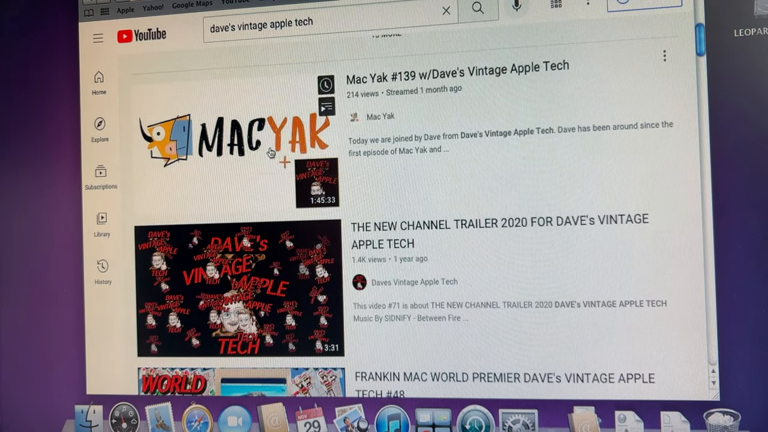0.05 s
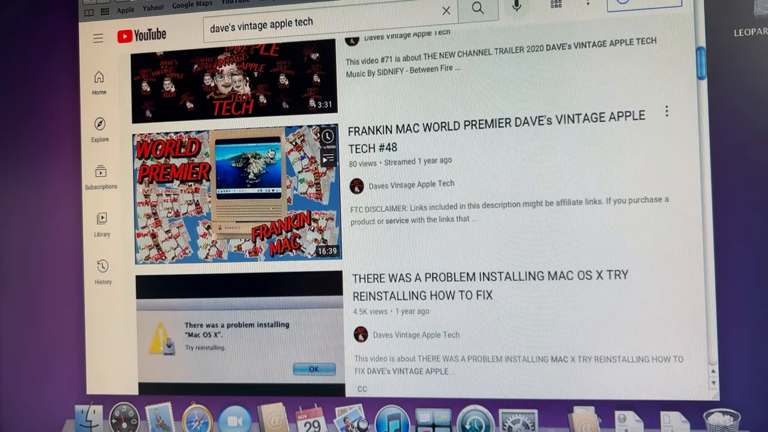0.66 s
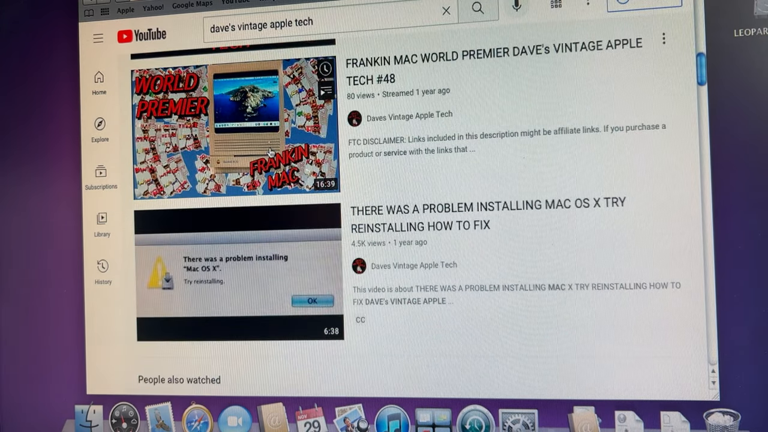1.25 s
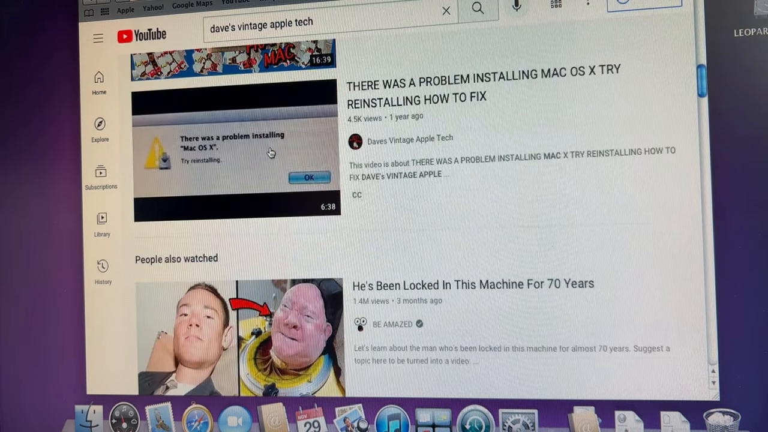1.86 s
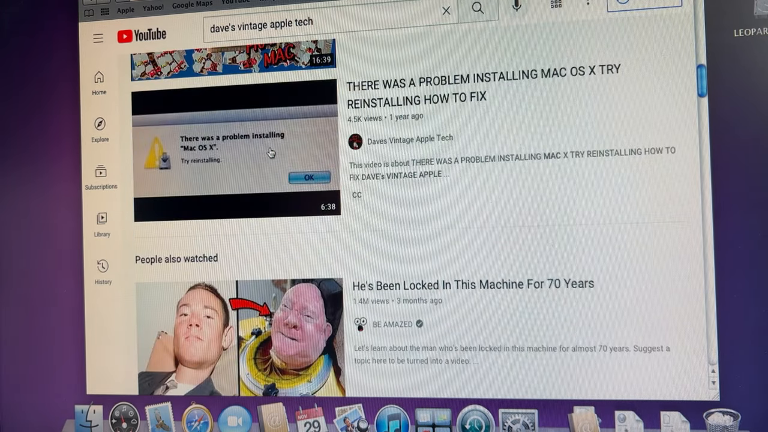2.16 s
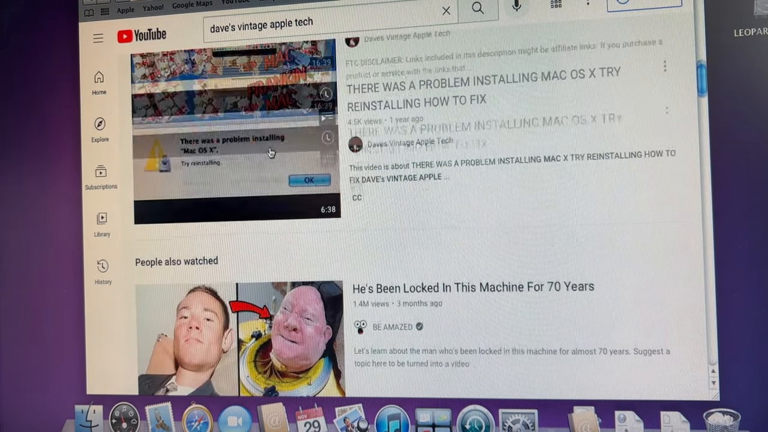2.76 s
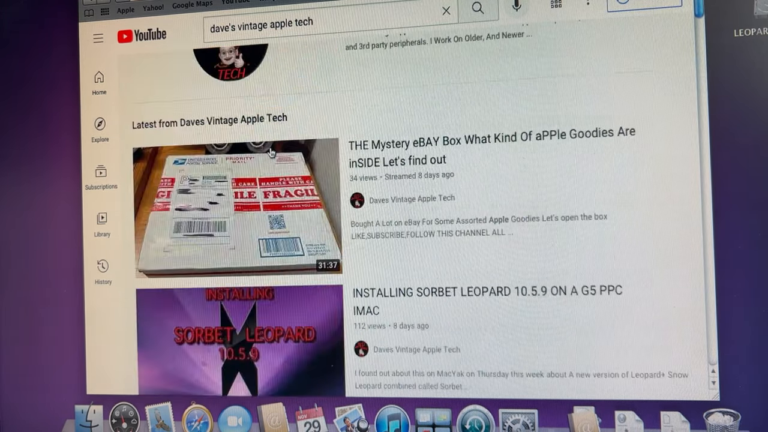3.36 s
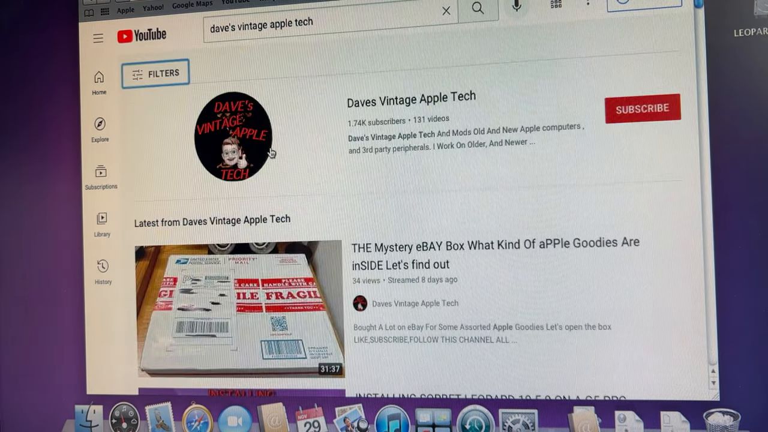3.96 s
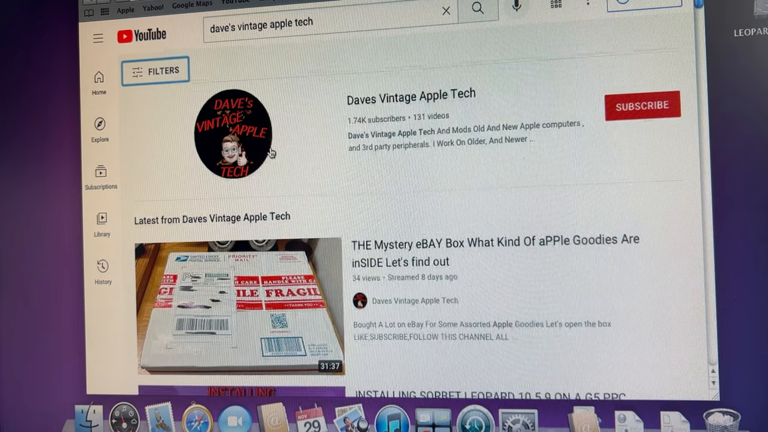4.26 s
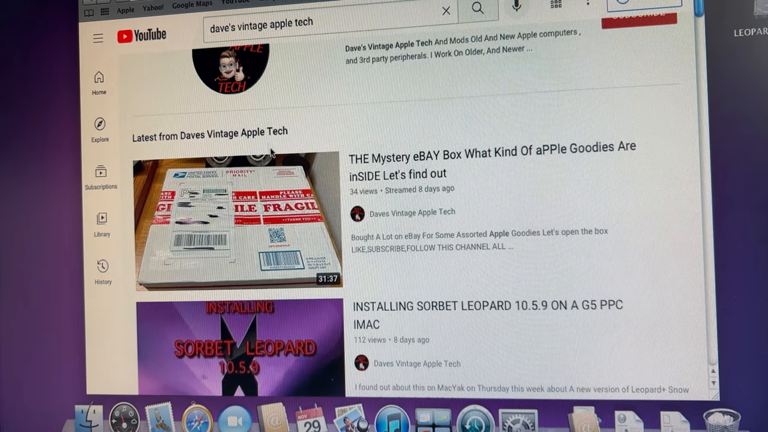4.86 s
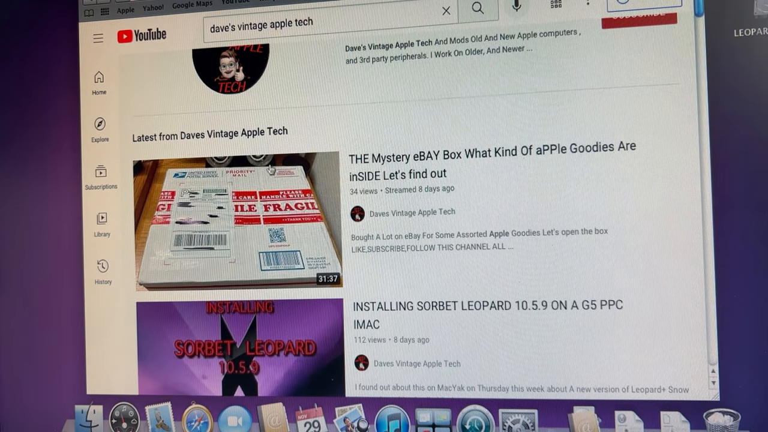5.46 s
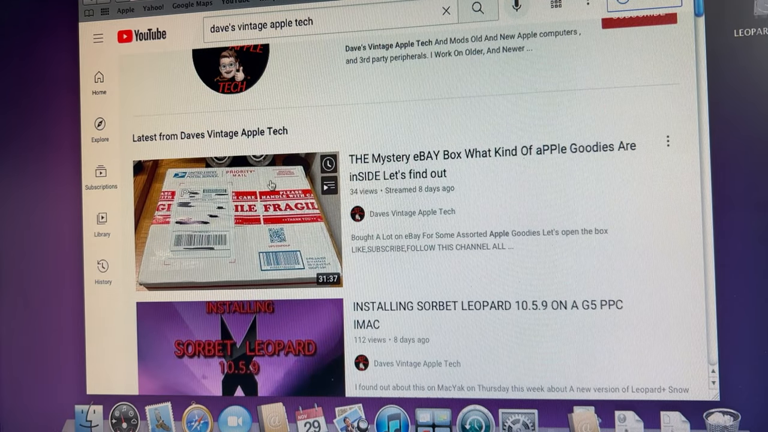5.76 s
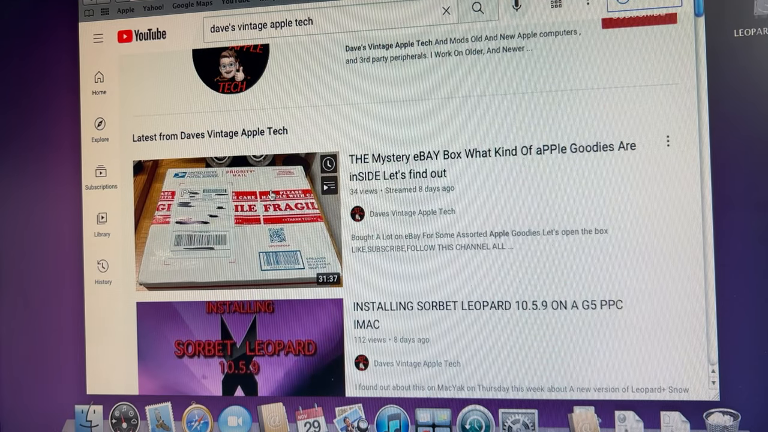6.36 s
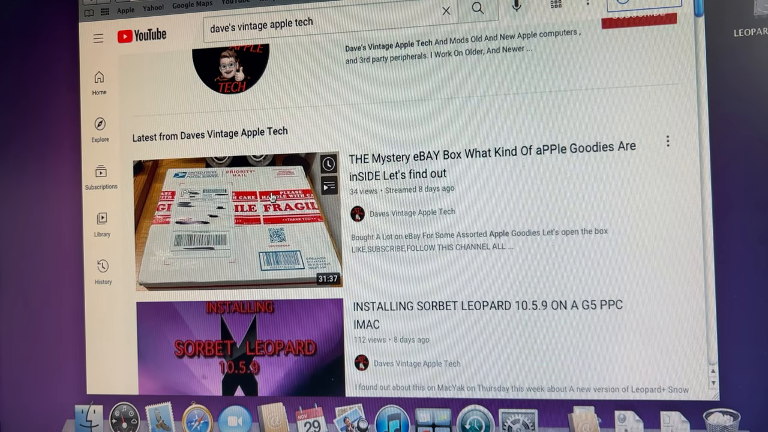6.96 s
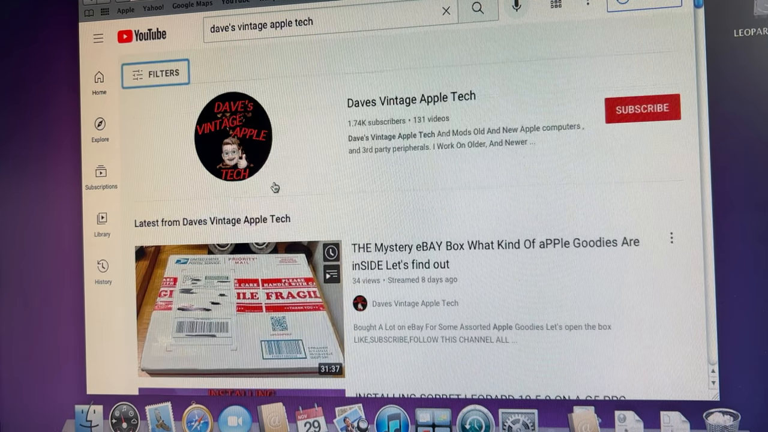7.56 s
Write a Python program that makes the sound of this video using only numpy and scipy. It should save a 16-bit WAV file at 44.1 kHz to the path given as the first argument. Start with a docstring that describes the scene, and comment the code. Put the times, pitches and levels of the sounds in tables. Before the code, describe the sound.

A desktop computer's even fan hum runs under light mouse clicks, short scroll wheel flicks and soft bumps on the microphone.

```python
"""Two cooling fans hum in a desktop computer close by: their slightly unbalanced shafts and
passing blades make steady tones. Behind them, swirling air rushes and makes the case and desk ring.
Someone scrolls and clicks a mouse, ringing its shell and the desk, with bright snaps and short scuffs.
A few soft bumps on the hand-held stereo microphone come through as low thumps."""
import sys
import numpy as np
from scipy import signal
from scipy.fft import rfft, irfft
from scipy.io import wavfile

SR = 44100
rng = np.random.default_rng(int(sys.argv[2]) if len(sys.argv) > 2 else 0)


def unload_audio(sound):
    """Save the sound as a 16-bit wav file, at the path given as the first command line argument."""
    columns = np.transpose(np.atleast_2d(sound))
    # keep every value between -1 and 1, then stretch to whole-number steps
    steps = np.round(np.clip(columns, -1, 1) * 32767)
    wavfile.write(sys.argv[1], SR, steps.astype(np.int16))


N = 340452
T, HZ = np.arange(N) / SR, np.fft.rfftfreq(N, 1 / SR)

# the rush of air: f/Hz, level/dB per Hz
AIR_SPECTRUM = [(20, -89), (35, -77), (70, -71), (130, -71), (220, -72.5), (420, -75.5), (730, -68.3),
                (1050, -71.5), (1750, -77), (3000, -79.5), (4500, -83.5), (6500, -90), (7200, -92),
                (9400, -100.3), (10300, -108), (12500, -108), (14000, -125)]
# how alike the air sounds left and right: f/Hz, likeness (1 the same, -1 opposite)
AIR_LIKENESS = [(110, 0.72), (170, 0.29), (260, -0.47), (450, -1), (750, -0.92), (1500, -0.034),
                (2500, -0.26), (8500, 0.36)]
# pitches at which case and desk ring: f/Hz, width/Hz, left level/dB, right level/dB, left lead/rad
CASE_RESONANCES = [(282, 30, -63.0, -80.5, 3.1), (295, 16, -56.5, -59.0, 0.1), (314, 44, -60.5, -67.0, 0.9),
                   (385, 41, -58.5, -68.5, 0.3), (450, 55, -64.5, -64.5, 0.1), (499, 54, -68.5, -66.5, 0.7),
                   (541, 45, -73.0, -62.5, -2.9), (571, 26, -78.5, -58.5, -0.1),
                   (594, 19, -68.0, -56.5, -1.5), (640, 29, -61.0, -61.0, 3.1),
                   (683, 40, -68.0, -65.5, 1.1), (727, 45, -62.0, -63.0, 3.0),
                   (779, 47, -64.0, -65.5, -2.9), (804, 19, -62.0, -74.5, -1.8),
                   (848, 24, -57.0, -74.5, -1.1), (884, 17, -62.5, -68.5, 2.3),
                   (920, 24, -70.0, -69.0, 0.4), (1039, 72, -69.0, -72.0, 3.1),
                   (1269, 34, -67.5, -66.0, 1.3), (1345, 44, -61.5, -68.5, 2.1),
                   (1378, 35, -62.5, -65.5, 2.5), (1461, 90, -72.5, -72.5, 3.1),
                   (1565, 61, -71.5, -71.5, 3.1), (1889, 41, -68.0, -72.5, -2.6),
                   (2106, 88, -73.0, -75.0, 1.4), (2211, 48, -73.5, -77.0, 1.5),
                   (2374, 123, -79.5, -80.5, 2.1), (2689, 45, -73.0, -79.5, -2.0),
                   (2819, 125, -73.5, -73.5, -2.3), (2891, 135, -80.0, -76.0, 1.7),
                   (3162, 92, -75.5, -82.0, -1.6), (3261, 40, -76.5, -84.0, 0.0),
                   (3775, 48, -79.5, -75.5, -0.2), (3871, 68, -82.5, -76.5, -1.4),
                   (4060, 165, -87.0, -80.0, -1.4), (4838, 450, -93.0, -80.5, 2.6),
                   (5526, 450, -95.0, -82.5, -3.1), (6344, 501, -91.0, -84.0, -1.6),
                   (7987, 175, -93.0, -98.0, -1.1), (8753, 327, -101.5, -101.5, -0.1)]
# the machine's other hums: f/Hz, left level/dB, right level/dB, left lead/rad, flutter (0 to 1)
HUMS = [(40.4, -62, -64, 0, .2), (71.3, -54, -54, 0, .16), (148, -52, -57.5, -1.7, .22),
        (323, -48.5, -60, 0, .3), (816.9, -48.5, -59, -2.8, .25), (851, -49.5, -60, 1.2, .44)]
# soft bumps on the microphone: t/s, level/dB, f/Hz
BUMPS = [(1.364, -40, 66), (2.632, -35, 105), (2.683, -20, 86), (5.83, -40, 51)]
# swells of rumble from the hand holding it: t/s, level/dB, rise/s, time to fade by 60 dB/s
HANDLING = [(1.17, -39, .093, .83), (1.39, -35, .08, .4), (2.665, -29.5, .05, .7), (5.8, -38.5, .17, .6)]
# the tone colour of that rumble: f/Hz, relative level/dB
RUMBLE_SPECTRUM = [(20, -22), (40, -7), (70, 9.5), (115, 3), (160, -8.5), (240, -20), (1000, -80)]
# bright plastic snaps and short scuffs of the mouse:
# t/s, level/dB, rise/s, time to fade by 60 dB/s, resonance f/Hz, treble tilt/dB per octave
SNAPS_AND_SCUFFS = [(1.505, -35, .0007, .07, 5200, -15), (5.012, -28, .0008, .085, 5700, 0),
                    (5.026, -30, .0015, .17, 5200, 0), (7.273, -28.5, .0005, .06, 4000, -7)]
# the tone colour they share: f/Hz, relative level/dB
SNAP_SPECTRUM = [(150, 0), (350, 10), (750, 3), (1200, 3.5), (2100, 1), (2700, -1), (3400, 2), (4500, -7),
                 (5600, -2), (6500, -4.5), (7200, -9), (8500, -10.5), (9600, -11), (10600, -14),
                 (13000, -24), (15500, -25)]
# flicks of the scroll wheel: start t/s, end t/s, rubbing level/dB
WHEEL_FLICKS = [(.81, 1, -57), (1.408, 1.687, -49), (2.573, 2.743, -47), (3.017, 3.136, -43),
                (4.074, 4.246, -49.5), (7.24, 7.416, -45)]
# the tone colour of plastic rubbing in the wheel: f/Hz, relative level/dB
RUB_SPECTRUM = [(500, -20), (1500, -8), (2050, -1), (2220, 16), (2420, 0), (2900, -2), (3700, -8),
                (5200, -14), (8000, -11), (11000, -36), (15500, -44)]
# the wheel's notches ticking past: t/s, tick level/dB
WHEEL_NOTCHES = [(.834, -32.5), (.886, -32), (.953, -32), (1.435, -36.5), (1.482, -33.5), (1.531, -31),
                 (1.582, -30.5), (1.658, -33.5), (2.609, -37.5), (2.631, -37.5), (2.704, -35.5),
                 (3.052, -38.5), (3.064, -36), (3.086, -38), (4.125, -38.5), (4.142, -36.5), (4.164, -33),
                 (4.232, -35), (7.203, -32.5), (7.346, -28), (7.39, -34)]
# clicks and finger taps: t/s, shell tick level/dB, desk knock level/dB, favoured desk pitch f/Hz
CLICKS = [(.845, -48, -33.5, 760), (.852, -48, -30.5, 830), (3.888, -54, -34, 600),
          (4.862, -31, -25.5, 650), (5.027, -36, -29, 900), (5.049, -50, -27.5, 430),
          (5.631, -32, -23, 640)]
# the ringing notes (modes) of mouse shell and desk: f/Hz, relative level/dB, time to fade by 60 dB/s
SHELL_MODES = [(1340, -4, .04), (1940, -1, .04), (2120, 5, .05), (2215, 12.5, .06), (2430, 6, .045),
               (2540, 3, .045), (2820, -1, .04), (3200, -4, .035)]
DESK_MODES = [(430, -2, .1), (600, 0, .07), (665, 4, .1), (745, 2, .08), (830, 2, .06), (930, -1, .07)]
# tones of the small eleven-bladed fan and the main seven-bladed fan,
# listed by multiple of the shaft speed: left level/dB, right level/dB, left lead/rad
SMALL_FAN_TONES = {1: (-42.8, -42.8, 0), 22: (-52, -63, -2.7), 33: (-58, -70, 0)}
MAIN_FAN_TONES = {1: (-42.5, -44.5, .1), 4: (-68, -59, 3), 7: (-36.3, -41.5, 1.3), 8: (-47.5, -52, .3),
                  14: (-46, -46, 3.1), 16: (-45, -53, 1.8), 20: (-62, -60, 3), 21: (-52.5, -48, -2.3),
                  28: (-58.5, -57, 2.9), 32: (-66, -66, 1)}


def gain_of(db):
    """Turns decibels into a number to multiply a sound by."""
    return 10 ** (np.asarray(db) / 20)


def unit_level(x):
    """Scales a signal so that its average size (rms) is 1."""
    return x / np.sqrt(np.mean(x ** 2) + 1e-20)


def curve(points):
    """Joins a table's points into a value for every frequency, on a log frequency axis."""
    hz, value = np.transpose(points)
    return np.interp(np.log(HZ + 1), np.log(hz + 1), value)


def drift(rate_hz):
    """A random wobble of average size 1, with little in it faster than rate_hz."""
    return unit_level(irfft(rfft(rng.standard_normal(N)) / (1 + (HZ / rate_hz) ** 4), N))


def noise(db, likeness):
    """Stereo noise with a level in dB per Hz and a chosen likeness between left and right."""
    left, other = rfft(rng.standard_normal((2, N)))
    likeness = np.clip(likeness, -1, 1)
    right = likeness * left + np.sqrt(1 - likeness ** 2) * other
    return irfft(np.array([left, right]) * gain_of(db), N) * np.sqrt(SR / 2)


def swell(peak_s, rise_s, fade_s):
    """A loudness shape that grows until peak_s, then drops by 60 dB every fade_s."""
    return np.exp(np.minimum(T - peak_s, 0) / rise_s - np.log(1000) * np.maximum(T - peak_s, 0) / fade_s)


def tone(hz, left_db, right_db, lead, flutter):
    """One tone fluttering in the swirling air; its left wave runs ahead of the right by lead radians."""
    turns = np.cumsum(hz) / SR + rng.random()
    wave = np.exp(2j * np.pi * turns) * (1 + flutter * (drift(23) + 1j * drift(5.3)))
    left = gain_of(left_db) * wave
    right = gain_of(right_db) * wave * np.exp(-1j * lead)
    return np.sqrt(2) * np.array([left, right]).real


def air(unsteady_db=0.45):
    """Swirling air makes an even rush, its bass alike on both sides and its middle range opposite."""
    return noise(curve(AIR_SPECTRUM), curve(AIR_LIKENESS)) * gain_of(unsteady_db * drift(30))


def case(boost_db=0.17, unsteady_db=1.1):
    """Swirling air stirs each resonance of case and desk on its own, giving narrow bands of noise."""
    spectrum = np.zeros((2, len(HZ)), complex)
    for hz, width, left_db, right_db, lead in CASE_RESONANCES:
        near = abs(HZ - hz) < 5 * width
        peak = 1 / (1 + (np.sqrt(2) - 1) * (2 * (HZ[near] - hz) / width) ** 2)
        real, imaginary = rng.standard_normal((2, near.sum()))
        sides = np.array([[gain_of(left_db)], [gain_of(right_db) * np.exp(-1j * lead)]])
        spectrum[:, near] += sides * peak * (real + 1j * imaginary)
    return irfft(spectrum, N) * np.sqrt(N * SR) / 2 * gain_of(boost_db + unsteady_db * drift(19))


def hums(wander=0.00179):
    """The machine's weaker hums, each wavering in pitch on its own."""
    return sum(tone(hz * (1 + wander * drift(2.15)), *rest) for hz, *rest in HUMS)


def thumps(sway_db=-8):
    """Soft pushes on the microphone swing a low resonance, the same on both sides, amid some rumble."""
    booms = np.zeros(N)
    for s, db, hz in BUMPS:
        push = swell(s, rise_s=.017, fade_s=.11)
        sway = gain_of(sway_db) * swell(s, rise_s=.025, fade_s=.5)
        booms += gain_of(db) * (push + sway) * np.sin(2 * np.pi * hz * (T - s))
    grip = sum(gain_of(db) * swell(s, rise_s, fade_s) for s, db, rise_s, fade_s in HANDLING)
    rumble = unit_level(noise(curve(RUMBLE_SPECTRUM), likeness=0.93))
    return np.sqrt(2) * booms + grip * rumble


def snaps_and_scuffs(peak_db=4.5, peak_width_hz=1600, dull_from_hz=6000, grain_db=1.2, grain_hz=300):
    """Bright plastic snaps and short scuffs of the mouse, each with its own resonance."""
    sound = np.zeros((2, N))
    sides = gain_of([[-3.5], [2]])  # the mouse lies to the right
    octaves_up = np.log2(np.maximum(HZ / dull_from_hz, 1))  # the duller ones lose this treble
    for s, db, rise_s, fade_s, hz, tilt_db in SNAPS_AND_SCUFFS:
        resonance_db = peak_db * 2 ** -(2 * (HZ - hz) / peak_width_hz) ** 2
        colour_db = curve(SNAP_SPECTRUM) + resonance_db + tilt_db * octaves_up
        sound += gain_of(db) * swell(s, rise_s, fade_s) * unit_level(noise(colour_db, likeness=0.79))
    return sound * sides * gain_of(grain_db * drift(grain_hz))


def ring(modes, detune=0.01, side_turns=0.07, uneven_db=1.5, rise_s=.0012):
    """One tap sets fading notes ringing, a little different each time and on each side."""
    hz, db, fade_s = np.transpose(modes)[:, :, None]
    db = db + uneven_db * rng.standard_normal(hz.shape)
    t = T[:SR // 10]
    start_turns = rng.random(hz.shape) + side_turns * rng.standard_normal((2, len(modes), 1))
    turns = hz * (1 + detune * rng.standard_normal(hz.shape)) * t + start_turns
    waves = gain_of(db - 60 * t / fade_s) * np.sin(2 * np.pi * turns)
    build_up = 1 - np.exp(-t / rise_s)  # a fingertip is soft
    return waves.sum(1) * np.sqrt(2) / np.linalg.norm(gain_of(db)) * build_up


def desk_knock(spot_hz, boost_db=5, reach_octaves=.2):
    """A knock on the desk: the spot that is struck favours the notes near spot_hz."""
    return ring([(hz, db + boost_db * 2 ** -(np.log2(hz / spot_hz) / reach_octaves) ** 2, fade_s)
                 for hz, db, fade_s in DESK_MODES])


def mouse(grain_db=3.0, snap_db=-7.5, notch_knock_db=-6, notch_hz=830):
    """The wheel rubs loudest in mid-flick; each notch or click snaps and rings the shell and the desk."""
    rings, rolling = np.zeros((2, N)), np.zeros(N)
    sides = gain_of([[-1.5], [1.5]])  # the mouse lies to the right
    for start, end, db in WHEEL_FLICKS:
        progress = np.clip((T - start) / (end - start), 0, 1)
        rolling += gain_of(db) * np.sin(np.pi * progress)
    friction = rolling * gain_of(grain_db * drift(70))
    notches = [(s, db, db + notch_knock_db, notch_hz) for s, db in WHEEL_NOTCHES]
    for s, tick_db, knock_db, spot_hz in CLICKS + notches:
        tick = gain_of(tick_db) * sides * ring(SHELL_MODES)
        knock = gain_of(knock_db) * desk_knock(spot_hz)
        slot = rings[:, round(s * SR):][:, :tick.shape[1]]
        slot += (tick + knock)[:, :slot.shape[1]]
        friction += gain_of(tick_db + snap_db) * swell(s, rise_s=0.00023, fade_s=0.034)
    rub = unit_level(noise(curve(RUB_SPECTRUM), likeness=0.96))
    return rings + sides * friction * rub


def fan(tones, turns_per_s, wander, flutter):
    """A fan's imbalance hums at its slightly wandering shaft speed, its blades at whole multiples of it."""
    shaft_hz = turns_per_s * (1 + wander * drift(2.055))
    return sum(tone(multiple * shaft_hz, *sides, flutter) for multiple, sides in tones.items())


def scene():
    """The running computer and the hand at work in front of it."""
    main_fan = fan(MAIN_FAN_TONES, turns_per_s=53.09, wander=0.00041, flutter=0.122)
    small_fan = fan(SMALL_FAN_TONES, turns_per_s=85.87, wander=0.002, flutter=0.39)
    return main_fan + small_fan + hums() + air() + case() + mouse() + snaps_and_scuffs() + thumps()


def record(dry):
    """Cuts away the very highest treble."""
    low_pass = signal.firwin(511, cutoff=15750, window=("kaiser", 9), fs=SR)
    return signal.oaconvolve(dry, low_pass[None], "same")


dry = scene()
out = record(dry)
unload_audio(out)
```